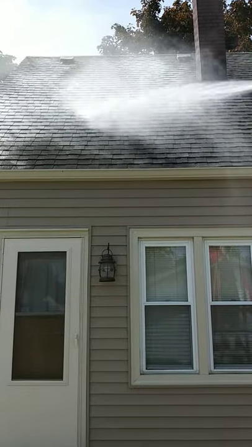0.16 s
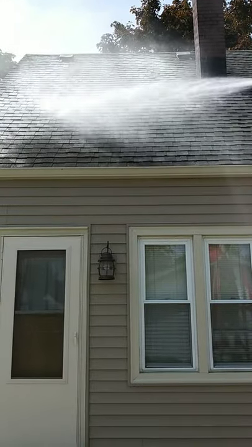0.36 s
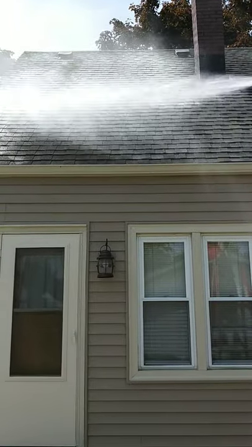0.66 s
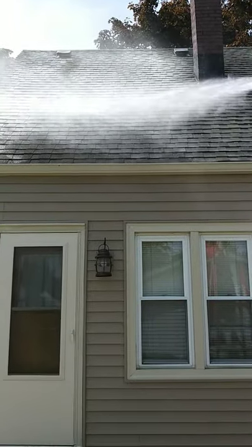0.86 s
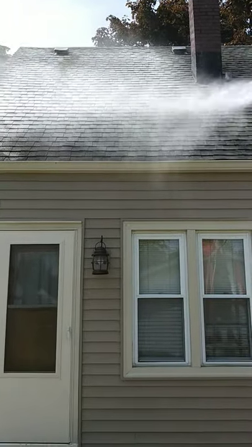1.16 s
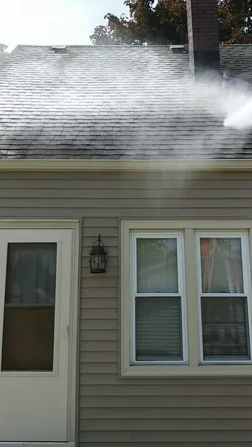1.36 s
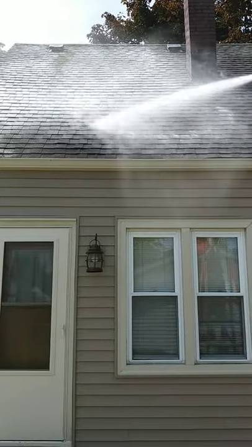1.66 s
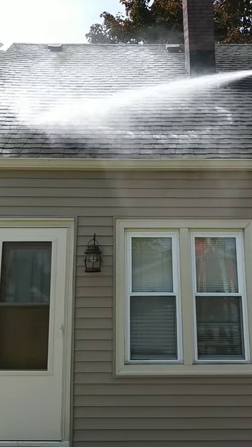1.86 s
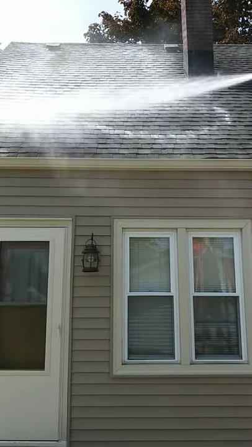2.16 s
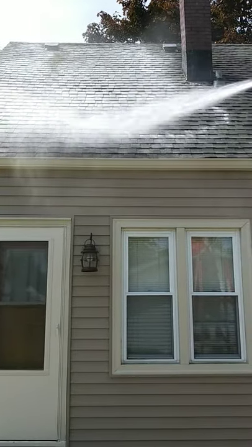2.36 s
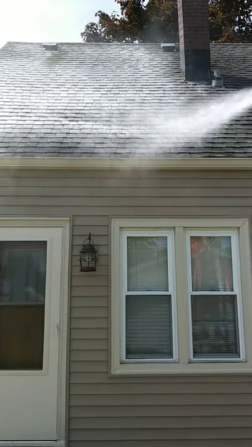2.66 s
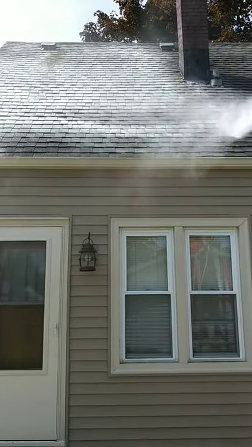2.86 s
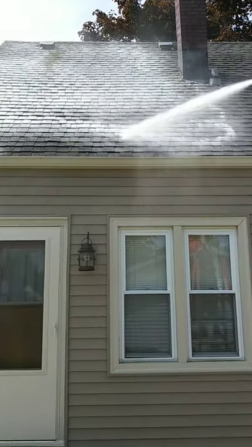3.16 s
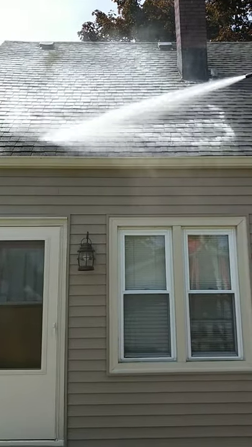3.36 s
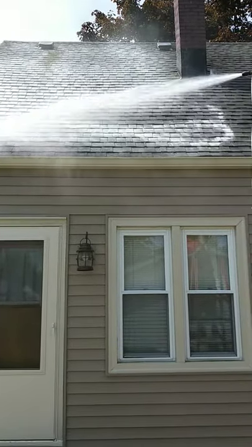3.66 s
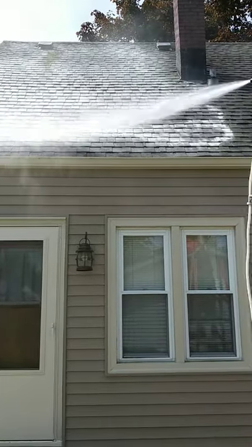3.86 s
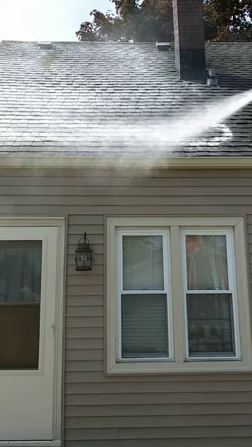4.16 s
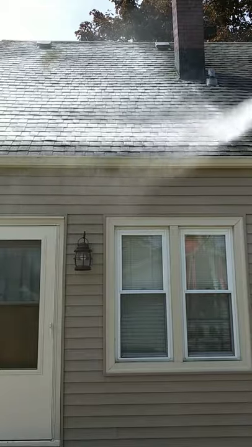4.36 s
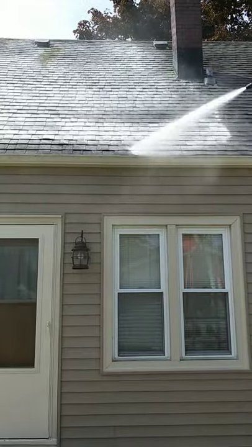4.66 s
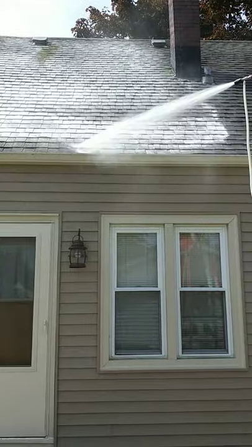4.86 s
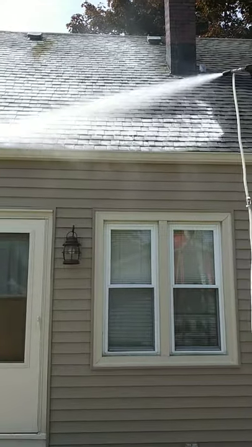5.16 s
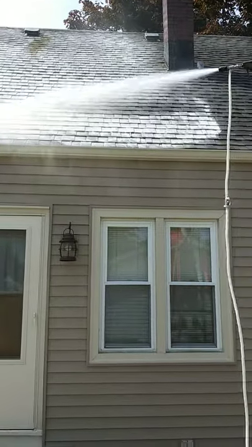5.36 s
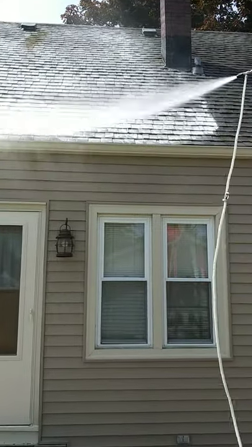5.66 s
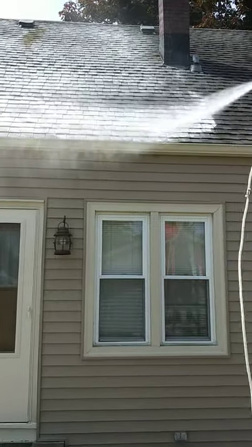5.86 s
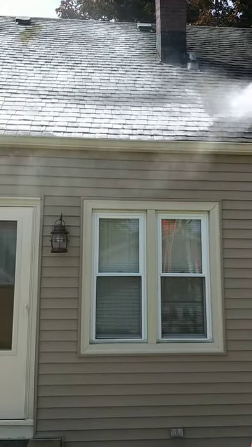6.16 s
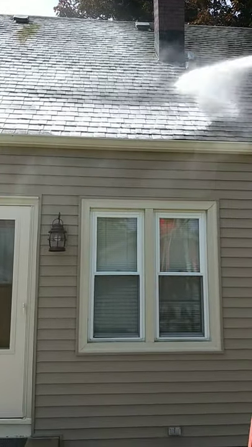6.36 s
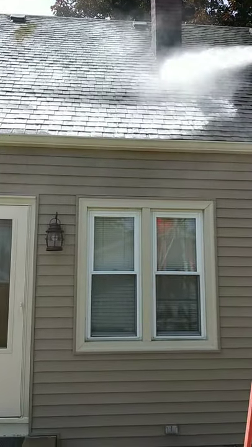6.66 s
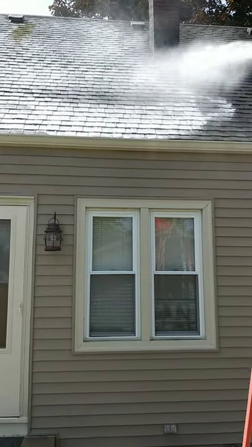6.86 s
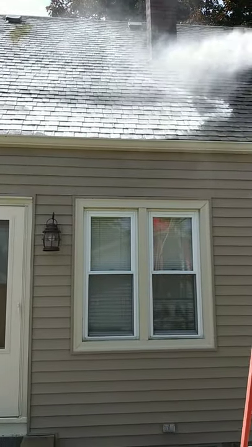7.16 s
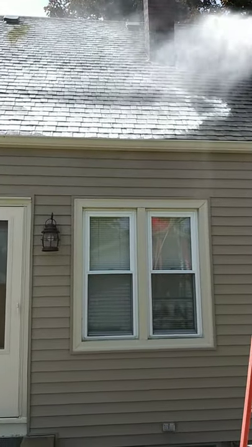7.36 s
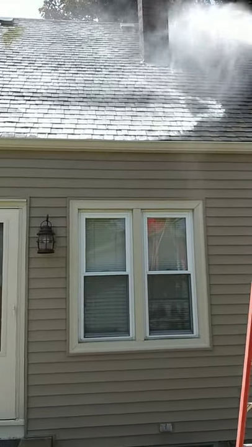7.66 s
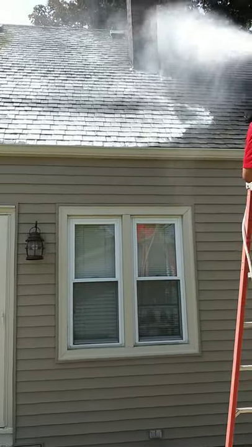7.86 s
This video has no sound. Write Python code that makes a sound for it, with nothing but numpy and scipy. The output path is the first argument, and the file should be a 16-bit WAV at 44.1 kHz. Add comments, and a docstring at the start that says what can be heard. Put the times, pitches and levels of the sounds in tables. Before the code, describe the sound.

A spray wand hisses loudly and steadily, high-pitched, as liquid splashes and patters on roof shingles outdoors.

```python
"""A yard, with a small mono microphone facing a roof where a spray wand sweeps a fan of cleaning liquid.
Far off, the pump engine drones under a dull rush. Drops patter on the shingles, and the jet splashes
brighter when it lands steep and close. Loudest is the nozzle, hissing around a sharp high resonance.
Roof, wall and ground add short, flickering echoes, and the hiss drives the recorder's limiter."""
import sys
import numpy as np
from scipy import signal
from scipy.fft import rfft, irfft, next_fast_len
from scipy.io import wavfile
from scipy.ndimage import uniform_filter1d, minimum_filter1d

SR = 44100
rng = np.random.default_rng(int(sys.argv[2]) if len(sys.argv) > 2 else 0)


def output_pcm(signal):
    """Save a mono or channel-first signal as 16-bit PCM at the path in sys.argv[1].

    Samples are clipped to [-1, 1] before scaling.
    """
    pcm = np.clip(np.atleast_2d(signal).T, -1, 1) * 32767
    wavfile.write(sys.argv[1], SR, np.round(pcm).astype(np.int16))


N = 353241
FRAME, HOP = 1024, 256
FRAME_S = np.arange(N // HOP + 4) * HOP / SR
BIN_HZ = np.maximum(np.arange(FRAME // 2 + 1) * SR / FRAME, 1)

# pump engine at the microphone: (multiple of the firing rate, rms level [dB])
ENGINE_ORDERS = [(2, -64), (3, -64), (4, -61.5), (5, -62), (8, -63), (11, -59), (21, -63), (32, -68),
                 (36, -57.5), (37, -63), (46, -62), (48, -66)]
# spectra of the sources: (frequency [Hz], relative level [dB])
RUSH_SPECTRUM = [(12, -44), (20, -9), (81, -13.5), (181, -4), (264, -6.5), (318, -3), (539, -7.5),
                 (593, -6), (689, -6), (914, -1.5), (985, -4), (1060, -0.5), (1150, -3.5), (1410, -5),
                 (1800, -6), (2340, -23), (3960, -120)]
SHINGLE_SPECTRA = [
    [(1300, -23), (1700, -7), (2150, -0.5), (2350, -13), (2600, -34)],
    [(2050, -28), (2300, -6), (2600, -2.5), (2850, -6.5), (3100, -30)],
    [(2650, -20), (2900, -2.5), (3200, 1), (3450, -7), (3800, -22)],
]   # one each for the low, middle and upper band
SPRAY_SPECTRUM = [(3300, -9.5), (3700, 0), (4400, 1.5), (5000, -0.5), (5600, -19), (6200, -28)]
WHISTLE_SPECTRUM = [(4250, -30), (4420, -1), (4520, -1), (4700, -30)]
MIST_SPECTRUM = [(4600, -12), (5300, -0.5), (6000, -2.5), (6600, -0.5), (7300, 1.5), (8200, -17),
                 (9000, -32)]
SPLASH_SPECTRUM = [(8500, -36), (10000, -3), (10800, 1), (11500, -1.5), (12800, -4), (14300, 0.5),
                   (15500, -3.5), (17000, -34)]
HISS_SPECTRUM = [(6000, -37), (7300, -22.5), (8000, -11.5), (8500, -4.5), (8900, -4), (9400, -7.5),
                 (9800, -18.5), (10500, -26)]
SHOULDER_SPECTRUM = [(9000, -27), (9500, -4), (9800, 5), (10300, -3), (10900, -19), (12000, -34)]   # bright edge just above the hiss
# drops on the shingles: (time [s], low band [dB], middle band [dB], upper band [dB])
PATTER_LEVELS = [(0.0, -30.5, -23.5, -25.5), (0.5, -32.5, -26, -25.5), (0.9, -32.5, -25.5, -27),
                 (1.38, -33.5, -27.5, -26), (1.8, -33, -26.5, -26), (2.12, -33, -23.5, -25.5),
                 (2.5, -30.5, -26.5, -27.5), (2.86, -35, -27, -29), (3.15, -32, -25.5, -26),
                 (3.6, -32.5, -24, -27.5), (4.0, -32, -26, -27.5), (4.35, -34, -27.5, -29.5),
                 (4.9, -33.5, -25.5, -26), (5.5, -33.5, -25.5, -27), (5.85, -33.5, -26, -29.5),
                 (6.2, -31.5, -26.5, -26), (6.5, -37, -26, -29.5), (6.9, -39, -24, -30.5),
                 (7.3, -31, -23.5, -29.5), (7.75, -33, -22, -28), (8.01, -32.5, -23, -29.5)]
# mist along the sweep: (time [s], level [dB])
MIST_LEVELS = [(0.0, -26.3), (2.6, -27), (3.1, -27.4), (3.55, -25.5), (4.2, -28.5), (5.5, -26), (6.15, -30),
               (7.1, -25), (8.01, -26.8)]
# the wand swings back and the jet lands steep and close: (time [s], steepness [0-1], half-width [s])
WAND_TURNS = [(0.0, 0.3, 0.15), (1.35, 0.9, 0.26), (2.9, 0.98, 0.3), (4.45, 0.8, 0.29), (5.95, 0.6, 0.19),
              (6.5, 0.5, 0.34), (7.1, 0.55, 0.22)]
# the shoulder flares as its beam crosses the microphone: (time [s], gain [dB], half-width [s])
BEAM_FLARES = [(1.3, 7, 0.14), (1.87, 5, 0.07), (2.86, 9.5, 0.1), (5.3, 5.5, 0.25), (5.997, 4, 0.16),
               (6.5, 4.5, 0.29), (6.9, 3.5, 0.15)]
# distinct reflections around the yard: (delay [ms], relative level [dB])
YARD_ECHOES = [(4.5, -26), (5.3, -24.5), (6.6, -23), (12, -27.5), (21.2, -28), (28, -45)]

# how each layer follows the wand: (mid sweep [dB], steep jet adds [dB], raised wand adds [dB], wander [dB])
RUSH_DB = (-37, -0.5, 0.05, 0.65)
SPRAY_DB = (-27, 1.2, 0.9, 0.8)
SPLASH_DB = (-20, 4.5, -1.5, 0.64)
HISS_DB = (-10.5, 0.8, -1.6, 0.2)


def from_db(db):
    return 10 ** (np.asarray(db) / 20)


def unit_rms(x):
    return x / np.sqrt(np.mean(x ** 2) + 1e-20)


def curves(rows):
    """Each level column of a timed table, frame by frame."""
    times, *columns = np.transpose(rows)
    return [np.interp(FRAME_S, times, column) for column in columns]


def bells(rows, s=FRAME_S):
    """Sum of one bell curve per row, at the times s."""
    at, height, half_width = np.transpose(rows)[:, :, None]
    return np.sum(height * np.exp(-((s - at) / half_width) ** 2), axis=0)


def drift(rate_hz):
    """Slow random motion per sample: coarse noise, low-passed twice; rms 1."""
    step = 40
    pole = np.exp(-2 * np.pi * rate_hz * step / SR)
    slow = signal.lfilter([1], [1, -2 * pole, pole * pole], rng.standard_normal(N // step + 2002))[2000:]
    return np.interp(np.arange(N) / step, np.arange(len(slow)), unit_rms(slow))


def wander(s=FRAME_S, rate_hz=3.8):
    """Slow random motion at the times s; rms 1."""
    pole = np.exp(-2 * np.pi * rate_hz * HOP / SR)
    slow = signal.lfilter([1], [1, -2 * pole, pole * pole], rng.standard_normal(2 * len(FRAME_S)))
    return np.interp(s, FRAME_S, unit_rms(slow[len(FRAME_S):]))


def patches(width_hz, per_s):
    """Random field over frequency and time, in patches that change per_s times a second; rms 1."""
    field = rng.standard_normal((len(BIN_HZ), len(FRAME_S)))
    for axis, length in enumerate([width_hz * FRAME / SR, SR / HOP / per_s]):
        for _ in range(2):
            field = uniform_filter1d(field, max(round(length), 1), axis=axis, mode="wrap")
    return unit_rms(field)


def band_power(spectrum, level_db, shift=1):
    """Power over frequency and time: a spectrum at a moving level, its frequencies scaled by shift."""
    hz, db = np.transpose(spectrum)
    power = from_db(2 * np.interp(np.log(BIN_HZ[:, None] / shift), np.log(hz), db, left=-90, right=-90))
    return power / power.mean(axis=0) * from_db(2 * level_db)


def filtered(source, gain):
    """Source filtered frame by frame with gain[frequency, time]."""
    size = 2 * (len(gain) - 1)
    framing = dict(nperseg=size, noverlap=size - size // 4)
    frames = signal.stft(source, **framing)[2]
    return signal.istft(frames * gain[:, :frames.shape[1]], **framing)[1][:N]


def droplets(per_s, noise_share, spread_db=2.0):
    """Random impacts of uneven size on a bed of noise; rms 1."""
    sizes = from_db(spread_db * np.minimum(rng.exponential(1, N), 5)) * rng.choice([-1, 1], N)
    hits = unit_rms(sizes * (rng.random(N) < per_s / SR))
    return np.sqrt(1 - noise_share) * hits + np.sqrt(noise_share) * rng.standard_normal(N)


def aimed_db(layer, s=FRAME_S, raise_at_s=6.63, raise_takes_s=0.34):
    """Level of a layer as the wand swings, then is raised towards the ridge and stays there."""
    mid_db, steep_db, raised_db, wander_db = layer
    raised = np.clip((s - raise_at_s) / raise_takes_s + .5, 0, 1)
    return mid_db + steep_db * bells(WAND_TURNS, s) + raised_db * raised + wander_db * wander(s)


def pump_engine(firing_hz=28.88, swell_db=2.4):
    """Far off, harmonics of the firing rate: the speed wavers a little and the orders swell in four groups."""
    phase = 2 * np.pi * np.cumsum(firing_hz * (1 + 0.00393 * drift(2.38))) / SR
    swells = [swell_db * drift(5.0) for _ in range(4)]
    return sum(np.sqrt(2) * from_db(db + swells[i % 4]) * np.sin(order * phase + rng.uniform(0, 2 * np.pi))
               for i, (order, db) in enumerate(ENGINE_ORDERS))


def rush(trim_db):
    """Dull broadband rush behind the spray."""
    hz, db = np.transpose(RUSH_SPECTRUM)
    size = next_fast_len(N)
    bin_hz = np.arange(size // 2 + 1) * SR / size
    colour = from_db(np.interp(np.log(bin_hz + 1), np.log(hz), db, right=-90))
    noise = irfft(rfft(rng.standard_normal(size)) * colour, size)[:N]
    return from_db(aimed_db(RUSH_DB, np.arange(N) / SR) + trim_db) * unit_rms(noise)


def shingle_patter(wander_db=0.5):
    """Up on the roof, heavier drops knock on the shingles; three bands trade strength along the sweep."""
    bands_db = [db + wander_db * wander() for db in curves(PATTER_LEVELS)]
    power = sum(band_power(band, db) for band, db in zip(SHINGLE_SPECTRA, bands_db))
    drops = droplets(per_s=4000, noise_share=0.65)
    return filtered(drops, np.sqrt(power) * from_db(0.88 * patches(200, 5.0)))


def jet_landing(whistle_at_s=5.9, whistle_half_width_s=0.14):
    """The jet shatters on the roof: sputtering splash on top, smoother mist and spray lower in pitch."""
    splash_db = aimed_db(SPLASH_DB) - 0.19 * bells(BEAM_FLARES)   # dips as the hiss flares
    sputter = droplets(per_s=9000, noise_share=0.86) * from_db(0.47 * drift(25))
    splash_colour = np.sqrt(band_power(SPLASH_SPECTRUM, splash_db))
    splash = filtered(sputter, splash_colour * from_db(1.3 * patches(500, 5.6)))
    spray = band_power(SPRAY_SPECTRUM, aimed_db(SPRAY_DB))
    mist = band_power(MIST_SPECTRUM, curves(MIST_LEVELS)[0])
    whistle_swell = np.exp(-((FRAME_S - whistle_at_s) / whistle_half_width_s) ** 2)
    whistle = band_power(WHISTLE_SPECTRUM, level_db=-36) * whistle_swell
    colour = np.sqrt(spray + mist + whistle)
    return splash + filtered(rng.standard_normal(N), colour * from_db(1.4 * patches(300, 4.4)))


def nozzle_hiss(resonance_hz=8816, bend_hz_per_db=17, waver_hz=45):
    """Turbulence in the tip excites a resonance that bends as the wand turns; its shoulder beams with the aim."""
    flare_db = bells(BEAM_FLARES)
    shoulder = band_power(SHOULDER_SPECTRUM, level_db=-22 + flare_db + 1.3 * wander())
    centre_hz = resonance_hz + bend_hz_per_db * flare_db + waver_hz * wander()
    hiss = band_power(HISS_SPECTRUM, aimed_db(HISS_DB), shift=centre_hz / 8800)   # unshifted at 8800 Hz
    colour = np.sqrt(hiss + shoulder)
    return filtered(rng.standard_normal(N), colour * from_db(0.5 * patches(300, 6.7)))


def yard_echoes(sound, first_ms=2.5, scatter_db=-31, t60_ms=116, shuffle_s=0.067):
    """Roof, wall and ground return short echoes, reshuffled as the jet moves: flickering streaks."""
    size, hop = 4096, 1024
    lag_ms = np.arange(size // 2)[:, None] * 1000 / SR
    strength = from_db(scatter_db - 60 * lag_ms / t60_ms) * (lag_ms > first_ms)
    for ms, db in YARD_ECHOES:
        strength = strength + from_db(db) * np.exp(-((lag_ms - ms) / 0.28) ** 2)
    draws = rng.standard_normal((size // 2, N // hop + 4))
    memory = np.exp(-hop / SR / shuffle_s)
    paths = unit_rms(signal.lfilter([1], [1, -memory], draws)[:, 1:]) * strength
    paths[0] = 1   # straight to the microphone
    paths = paths / np.sqrt(np.mean(np.sum(paths ** 2, axis=0)))
    return filtered(sound, rfft(paths, size, axis=0))


def scene():
    """One microphone feeds both channels; part of the rush comes from afar and stays smooth."""
    near = yard_echoes(nozzle_hiss() + jet_landing() + shingle_patter() + rush(trim_db=-1.5))
    mono = near + rush(trim_db=-4.5) + pump_engine()
    return np.array([mono, mono])


def record(dry, limit=0.7, attack_ms=0.17, release_db_per_ms=2, cutoff_hz=15490):
    """The recorder's fast look-ahead limiter holds the peaks, then the top is cut."""
    over_db = np.maximum(20 * np.log10(np.abs(dry[0]) / limit + 1e-9), 0)
    release_db = release_db_per_ms * 1000 * np.arange(N) / SR
    held_db = np.maximum.accumulate(over_db + release_db) - release_db
    span = max(round(attack_ms * SR / 1000), 1)
    reduction_db = uniform_filter1d(-minimum_filter1d(-held_db, 2 * span), span)
    low_pass = signal.ellip(12, .2, 60, cutoff_hz, fs=SR, output="sos")
    return signal.sosfilt(low_pass, dry * from_db(-reduction_db))


dry = scene()
out = record(dry)
output_pcm(out)
```